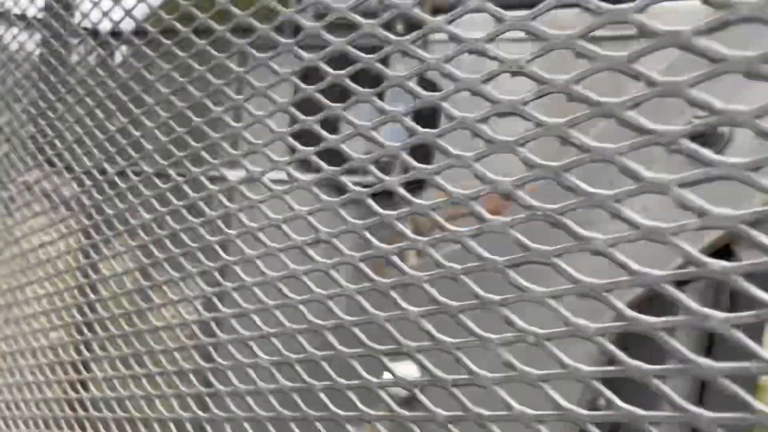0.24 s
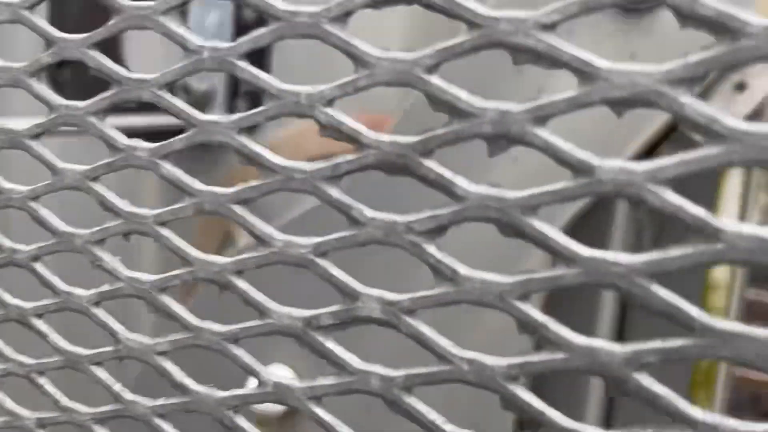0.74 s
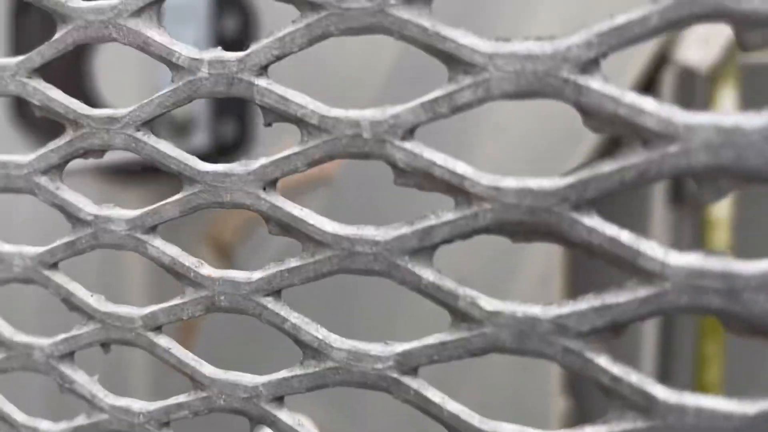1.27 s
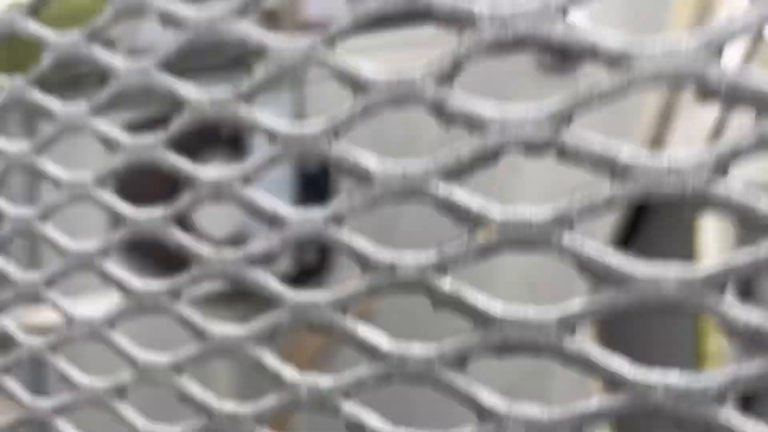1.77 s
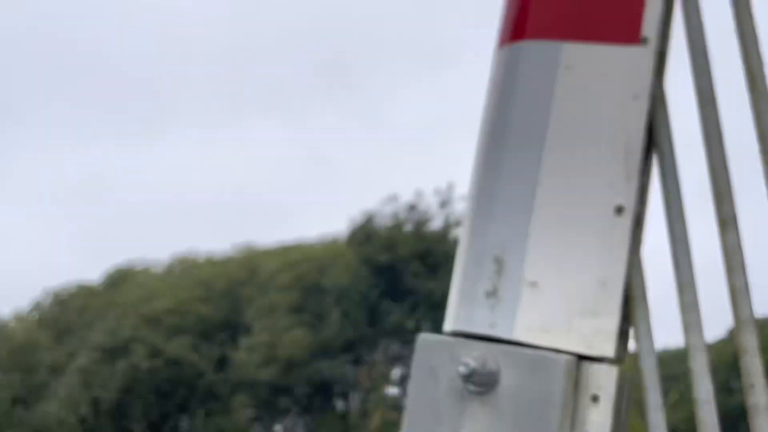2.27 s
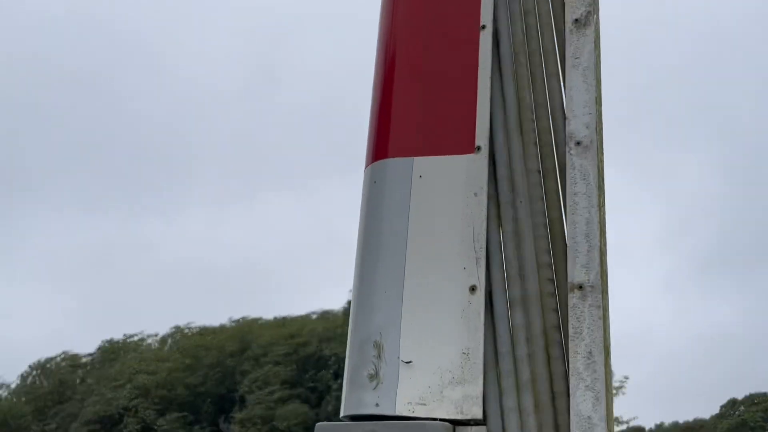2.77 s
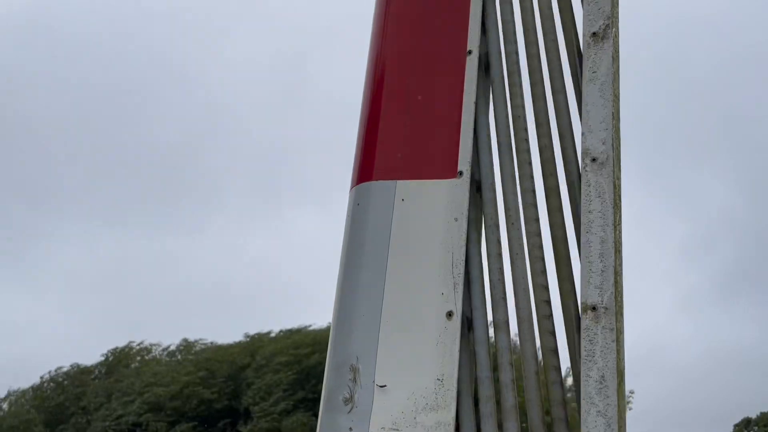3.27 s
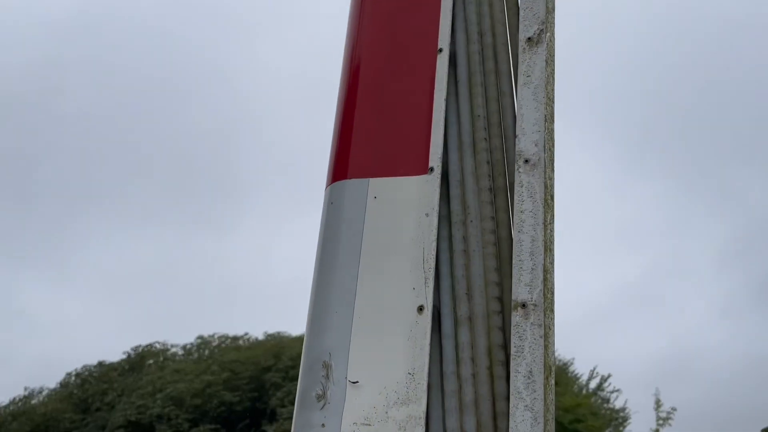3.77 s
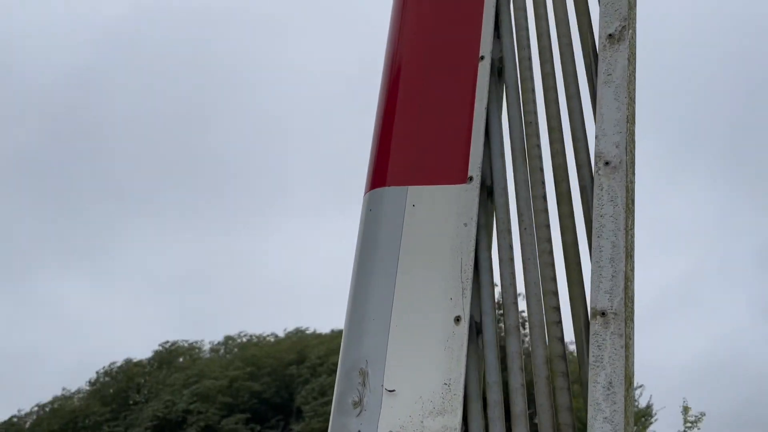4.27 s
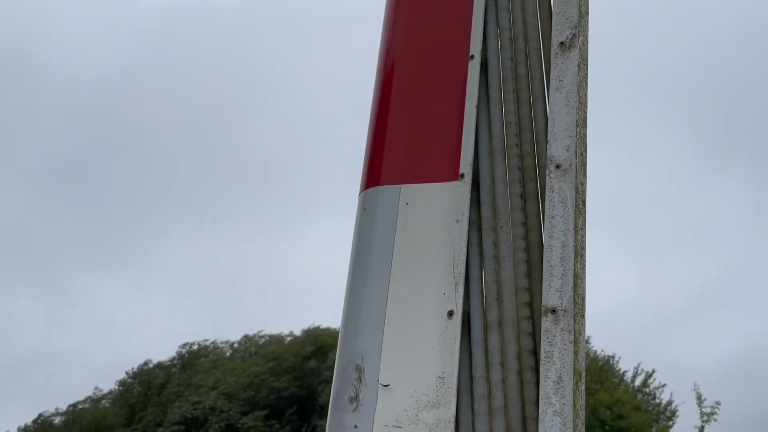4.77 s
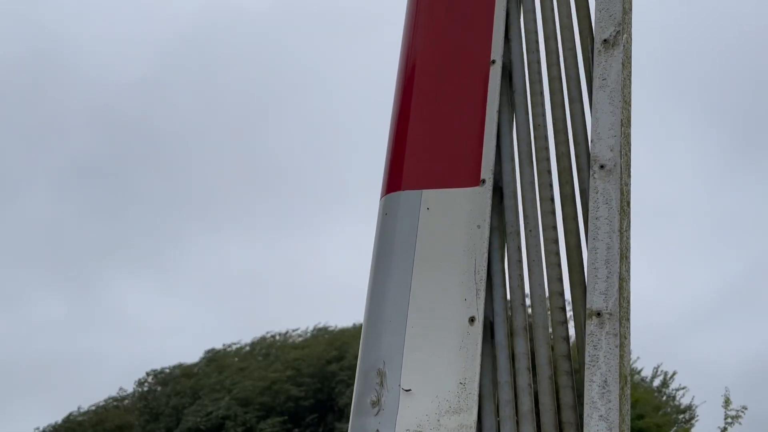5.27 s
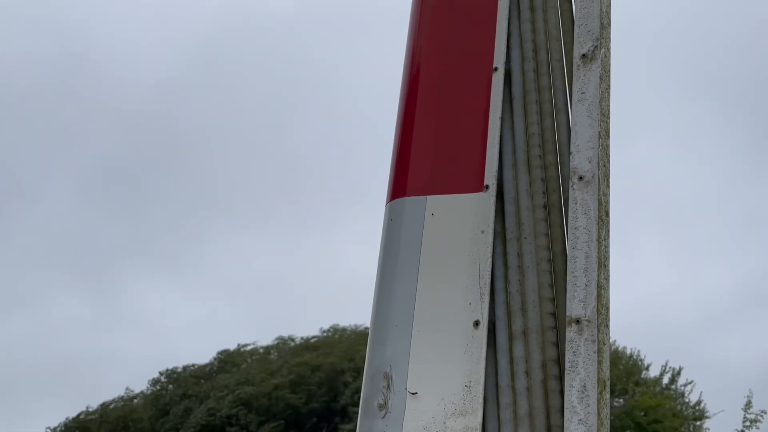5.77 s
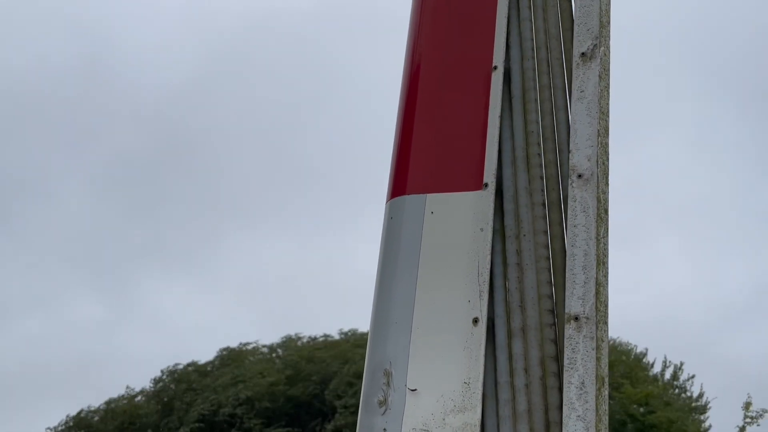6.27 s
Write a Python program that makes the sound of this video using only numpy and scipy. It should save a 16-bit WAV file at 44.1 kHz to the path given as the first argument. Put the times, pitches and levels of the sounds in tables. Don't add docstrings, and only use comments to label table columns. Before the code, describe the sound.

A droning geared motor winds down quickly, leaving thin bars ticking and clattering together above road rumble and a softly idling engine.

```python
import sys
import numpy as np
from scipy import signal
from scipy.fft import rfft, irfft, next_fast_len
from scipy.io import wavfile
from scipy.ndimage import uniform_filter1d

SR = 44100
rng = np.random.default_rng(int(sys.argv[2]) if len(sys.argv) > 2 else 0)


def master(y):
    cut = np.clip(np.atleast_2d(y).T, -1, 1)
    pcm = np.round(cut * 32767)
    wavfile.write(sys.argv[1], SR, pcm.astype(np.int16))


def elevation(decibels):
    levels = np.asarray(decibels, float)
    return 10 ** (levels / 20)


N = 287973
T = np.arange(N) / SR


def evened(x):
    return x / np.sqrt(np.mean(x ** 2) + 1e-20)


def read(points, hz):
    f, value = np.transpose(points)
    return np.interp(np.log(hz + 1), np.log(f + 1), value)


def curves(rows):
    s, *columns = np.transpose(rows)
    since_start = T - s[0] + .03 * (s[0] == 0)
    gate = np.clip(np.minimum(since_start, s[-1] - T) / .03, 0, 1)
    return gate, *(np.interp(T, s, c) for c in columns)


def stage(start, full, ease, end):
    return np.clip(np.minimum((T - start) / (full - start), (end - T) / (end - ease)), 0, 1)


def drift(per_s):
    hz = np.geomspace(per_s / 12, per_s, num=16)
    t = T[::64, None]
    slow = (np.sin(2 * np.pi * (hz * t + rng.random(16))) / np.sqrt(hz)).sum(1)
    return np.interp(T, t[:, 0], evened(slow))


# pitch_hz, likeness_0_to_1
LIKENESS = [(60, 0.9221), (130, 0.9192), (290, 0.46), (640, 0.25), (1410, 0.14), (3100, 0.6707),
            (5500, 0.5623), (7000, 1), (16000, 0.7914)]


def noise(colour, patchy_db, alike):
    frames, hz = N // 256 + 5, np.fft.rfftfreq(1024, 1 / SR)
    a, b, c, d, patches = rng.standard_normal((frames, 513, 5)).T
    patches = evened(uniform_filter1d(uniform_filter1d(patches, 10, 0), 12, 1))
    same = np.clip(read(LIKENESS, hz) * (1 - alike) + alike, 0, 1)[:, None]
    mid = (a + 1j * b) * np.sqrt(1 + same)
    side = (c + 1j * d) * np.sqrt(1 - same)
    z = np.array([mid + side, mid - side]) * elevation(read(colour, hz)[:, None] + patchy_db * patches)
    return evened(signal.istft(z, nperseg=1024, noverlap=768)[1][:, :N])


def groan(rows, steady, grain_s):
    gate, hz, db = curves(rows)
    grain = round(grain_s * SR)
    a, b = uniform_filter1d(uniform_filter1d(rng.standard_normal((2, N)), grain), grain)
    turn = np.exp(2j * np.pi * np.cumsum(hz) / SR)
    stumble = steady + (1 - steady) * (evened(a) + 1j * evened(b))
    return gate * elevation(db) * (stumble * (turn + 0.17405 * turn ** 2)).real


def ring(hits, modes):
    out = np.zeros(N)
    for h, (hz, t60, db) in zip(hits, modes):
        r, w = elevation(-60 / (t60 * SR)), 2 * np.pi * hz / SR
        poles = [1, -2 * r * np.cos(w), r ** 2]
        out += signal.lfilter([0, elevation(db) * r * np.sin(w)], poles, h + 1e-12)
    return out


def add(mix, s, sound):
    part = mix[round(s * SR):][:len(sound)]
    part += sound[:len(part)]


# time_s, turns_hz
SHAFT_SPEED = [(0, 70.5), (.5, 70.6), (.62, 70.25), (1.2, 70), (1.45, 69.65), (1.7, 69.5), (2.05, 69.1),
               (2.62, 69.1)]


def shaft_turn():
    return 2 * np.pi * np.cumsum(curves(SHAFT_SPEED)[1]) / SR


# multiple_of_shaft, level_db
LOW_ORDERS = [(1, -51), (2, -56), (3, -57), (4, -51), (6, -56), (7, -61), (9, -60), (15, -66), (19, -66),
              (20, -66)]
# multiple_of_shaft, level_db
SLOT_ORDERS = [(34, -70), (36, -68), (37, -64), (38, -68), (39, -68), (40, -67), (41, -60), (43, -59),
               (45, -68), (46, -70), (48, -70)]
# time_s, gain_db
SLOT_GAIN = [(0, -2.5), (.9, 0.5), (1.4, 1), (1.8, -4), (2.0, -8), (2.62, -1)]
# time_s, share_0_to_1
GEAR_LOAD = [(0, 0), (.33, .3), (.55, .78), (1.2, 0.96), (1.75, 0.93), (2.0, 0.82), (2.62, .6)]
# time_s, level_db
FIFTH_ORDER = [(0, -47), (.07, -45), (.16, -40.5), (.24, -42), (.33, -44), (.385, -39), (.46, -39),
               (.496, -48), (.53, -38), (.66, -35), (1.2, -36), (1.92, -36), (1.99, -47), (2.62, -48)]
TENTH_DB, TENTH_LIGHT_DB = -42, -26
EIGHTH_DB, EIGHTH_GAIN_DB_PER_S = -66.5, 6
BEAT_PER_S, BEAT_TOP_S = 12.8, .155
BEAT_ASIDE = (.07, .09, .36, .385)  # starts, full, eases, gone [s]


def shaft_whine(turn):
    gate, load = curves(GEAR_LOAD)
    on = slice(np.count_nonzero(gate) + 1)
    aside = stage(*BEAT_ASIDE) + (T > FIFTH_ORDER[-2][0])
    throb = 1 - aside * (1 + np.cos(np.pi * BEAT_PER_S * (T - BEAT_TOP_S)))
    fifth_db = curves(FIFTH_ORDER)[1]
    tenth_db = TENTH_DB + TENTH_LIGHT_DB * (1 - load)
    eighth_db = EIGHTH_DB + EIGHTH_GAIN_DB_PER_S * T
    slot_db = curves(SLOT_GAIN)[1] + 1.052
    lines = np.zeros(N)
    for k, db, swell in ((5, fifth_db, throb), (10, tenth_db, 1), (8, eighth_db, 1)):
        lines += elevation(db + 1.0 * drift(25)) * np.sin(k * turn) * swell
    for k, db in LOW_ORDERS + SLOT_ORDERS:
        gain_db = np.where(k > 30, slot_db[on], -2.5)
        level = elevation(db + gain_db + 2.034 * drift(10.097)[on])
        lines[on] += level * np.sin(round(k) * turn[on] + 6.937 * rng.random())
    return gate * lines


# time_s, pitch_hz, level_db
GEAR_WEAR = [(0, 353, -62), (.6, 351, -56), (1.9, 346, -56), (2.15, 345, -48), (2.4, 345, -52),
             (2.64, 345, -50)]
# time_s, pitch_hz, level_db
FIFTH_RUNDOWN = [(2.6, 344.3, -50.5), (2.65, 308.9, -31), (2.71, 235, -31), (2.75, 170.4, -37.5),
                 (2.79, 124.9, -50.5)]
# time_s, pitch_hz, level_db
TENTH_RUNDOWN = [(2.65, 640, -47), (2.73, 379.3, -43), (2.77, 240.7, -35), (2.81, 187.7, -31),
                 (2.86, 139.2, -35), (2.93, 109.8, -53)]


def gear_groan():
    return groan(GEAR_WEAR, 0, .03) + groan(FIFTH_RUNDOWN, .7, .007) + groan(TENTH_RUNDOWN, .4, .007)


# pitch_hz, level_db
AIR_COLOUR = [(530, -52.5), (900, -24), (1370, -12), (1770, -18), (2930, 0), (3710, -3), (5630, -3),
              (7300, -12), (8500, -11.5), (10000, -16.5), (11600, -17), (13500, -18), (15400, -17),
              (16300, -47)]
AIR_DB, VENT_DB, BRAKE_DB = -53, 7, 6.5
VENT = (.84, .93, 1.47, 1.58)
BRAKE = (2.55, 2.7, 2.72, 2.9)


def guard_air(turn):
    air_db = AIR_DB + VENT_DB * stage(*VENT) + BRAKE_DB * stage(*BRAKE)
    running = np.clip((BRAKE[-1] - T) / .03, 0, 1)
    pulse = 1 + 0.066 * np.cos(turn)
    return running * elevation(air_db - 1.0) * pulse * noise(AIR_COLOUR, 1.0, 0.35)


# time_s, left_over_right_db
MOTOR_LEAN = [(0, 2.5), (.7, 4), (1.2, 2), (2.3, 3.5), (2.8, 0.5)]


def motor():
    turn = shaft_turn()
    tones = shaft_whine(turn) + gear_groan()
    lean_db = curves(MOTOR_LEAN)[1] * np.array([[.5], [-.5]])
    return (np.sqrt(2) * tones + guard_air(turn)) * elevation(lean_db)


# time_s, rumble_db
TRAFFIC_LEVEL = [(0, -60.5), (.2, -49.5), (.52, -44.5), (.92, -55.5), (1.37, -43.5), (2.2, -41),
                 (2.5, -43.5), (2.92, -33), (3.65, -36.5), (3.9, -33), (4.97, -36), (5.67, -33), (6.3, -31)]
# pitch_hz, level_db_per_hz
RUMBLE_COLOUR = [(12, -54), (20, -8), (43, 2), (80, 0.5), (135, -11.5), (182, -15), (220, -18.5),
                 (357, -15), (431, -12.5), (500, -26.5), (650, -21.5), (1100, -120)]
# pitch_hz, level_db_per_hz
WASH_COLOUR = [(88, -34.5), (150, -2), (234, -5), (428, -3.5), (668, -9), (1600, -13.5), (1830, -15),
               (2810, -17), (4840, -23), (7270, -28), (9000, -27), (11000, -39), (15400, -44),
               (16300, -66.5)]
WASH_DB, WASH_SHARE, WASH_LAG_S = -43.5, 0.4261, 0.76
PULL_DB, PULL_S = 2.2, (4.8857, 6.2)
SHELTER_DB, SHELTER = -3, (1.0, 1.4, 1.95, 2.2)


def road():
    rumble_db = curves(TRAFFIC_LEVEL)[1]
    slow_db = uniform_filter1d(rumble_db, round(WASH_LAG_S * SR), mode="nearest")
    wash_db = WASH_DB + WASH_SHARE * (slow_db + 34)
    wash_db += np.interp(T, PULL_S, (0, PULL_DB)) + SHELTER_DB * stage(*SHELTER)
    rumble = elevation(rumble_db + .5 + .7 * drift(8)) * noise(RUMBLE_COLOUR, 1, 0)
    return rumble + elevation(wash_db + 3.0 + 0.7 * drift(5)) * noise(WASH_COLOUR, 2.0493, 0.081)


# start_s, peak_db, case_ring_hz, ring_re_peak_db, pitch_sag_share
HAND_CLICKS = [
    (.1087, -16.5, 1155, -4, .8),
    (.606, -42, 868.3, 17, 0.26),
    (2.3487, -19, 899, -21, 0.01),
    (2.3492, -19, 1900, -6, .5),
    (2.3498, -4.5, 1020, -12.5, .25),
    (2.3669, -28.5, 912, 6, 0),
    (2.3701, -22.5, 900.1, -14, 0.04),
    (5.081, -23, 1160, 6, .9),
    (5.09, -36, 620, 12, .5),
    (5.2675, -31, 1190, 7, 1.2),
]


def hand():
    out, t = np.zeros((2, N)), T[:1500]
    grit = rng.standard_normal((len(HAND_CLICKS), 2, 1500))
    rise = np.exp(-((t - .0006) / 0.00021) ** 2)
    for (s, db, hz, ring_db, sag), pair in zip(HAND_CLICKS, grit):
        hard = elevation(.4 * db)
        bright = 0.22 * np.sin(2 * np.pi * 10500 * t) + 0.2 * np.sin(2 * np.pi * 6700 * t)
        snap = hard * bright - np.sin(2 * np.pi * 3100 * (t - .0006))
        case = np.sin(2 * np.pi * hz * (t - sag * 60 * t ** 2))
        case = case * np.exp(-t / 0.0035) * np.minimum(t / 0.00161, 1)
        for side, row in zip(out, pair):
            add(side, s - .0006, elevation(db) * (rise * (snap + .015 * row) + elevation(ring_db) * case))
    return out


# start_s, rattle_db, dies_60_db_s, low_body_re_rattle_db
SKIRT_SHAKES = [(2.7, -53.5, 1.27, 19.5), (2.76, -29, 0.6215, 0), (3.2, -26, .25, 1),
                (3.3, -33, 0.0016, -8.5), (3.345, -30.5, 0.2702, -12), (3.462, -33, 3, -3),
                (3.552, -22, .3, 5), (3.727, -32, .3, -6), (3.847, -33, 0.4295, -2.5), (4.15, -25, .13, -8),
                (4.21, -27, 0.1791, -2.5), (4.33, -37, 0.3832, -14.5), (4.459, -29, 0.42, 3.5),
                (4.69, -41, .5, -10.5), (5.082, -42, .35, 18), (5.4, -41, 2.0171, -6)]
SOFT_DB, SHAKE_RISE_S = -29.5, .005
SWING_DB, SWING_LOW_DB = -44, -5.5
SWING = (3.2, 3.3, 5.2, 5.6)


def shaking():
    t, (s, db, t60, low_db) = T[::32], np.transpose(SKIRT_SHAKES)[:, :, None]
    rise = np.clip((t - s) / (SHAKE_RISE_S * elevation(db - SOFT_DB)), 0, 1)
    shakes = (rise * elevation(db - 60 * np.maximum(t - s, 0) / t60)) ** 2
    brush = (stage(*SWING) * elevation(SWING_DB)) ** 2
    high, low = (np.interp(T, t, p.sum(0)) for p in (shakes, shakes * elevation(2 * low_db)))
    return np.sqrt(high + brush), np.sqrt(low + brush * elevation(2 * SWING_LOW_DB))


# pitch_hz, level_db_per_hz
METAL_COLOUR = [(590, -28), (1000, -11.5), (1900, -14), (2180, -4.5), (2450, -11), (2650, -14.5),
                (6340, -15.5), (7440, -18.5), (9040, -20), (10500, -25.5), (12800, -37), (15400, -36.5),
                (16300, -60)]
# pitch_hz, dies_60_db_s, level_db
BAR_MODES = [(1590, 0.04, -1), (2110, 0.06, -3), (2210, .08, -16.5), (2340, .05, -32.5), (2650, 0.05, 4.5),
             (3490, 0.05, -6), (4270, .04, -4), (4300, .05, -8), (5117.2, .045, -5), (5414.1, 0.021, 1.5),
             (6700, 0.043, -15.5), (10100, 0.033, -34)]
# pitch_hz, dies_60_db_s, level_db
BOOM_MODES = [(276.79, 0.10326, -1.5), (410.91, 0.10777, 1), (525.93, 0.03307, 9), (612, 0.085, 0),
              (744.95, 0.056, -1.5), (985.72, 0.044, 0.5), (1338, 0.031, -3)]


def rattle():
    high, low = shaking()
    struck = rng.random(N) < 1500 / SR
    size = elevation(3 * np.minimum(rng.exponential(1, N), 4) + 3.2 * drift(90)) * struck
    which = rng.integers(0, len(BAR_MODES), N)
    grains = signal.lfilter([1], [1, -np.exp(-1 / (0.0047 * SR))], size)
    metal = np.sqrt(evened(grains)) * noise(METAL_COLOUR, 3.915, 0.7)
    bars = ring([size * high * (which == k) for k in range(len(BAR_MODES))], BAR_MODES)
    body = ring([size * low * (which == k) for k in range(len(BOOM_MODES))], BOOM_MODES)
    unit = np.sqrt(np.mean(size ** 2))
    return elevation(-5) * high * metal + (elevation(-32) * bars + elevation(-26) * body) / unit


# start_s, peak_db, brightness_hz, dies_60_db_s
TIP_CLINKS = [(2.7323, -31, 6350, .03), (2.7595, -19, 11000, .06), (2.7849, -19, 7000, .05),
              (2.8576, -20, 6319, .02), (2.924, -35, 9500, .15), (3.2385, -19, 9000, .03),
              (3.302, -11, 5695, .018), (3.3206, -21, 7480, .015), (3.3408, -11, 9260, .012),
              (3.3551, -16, 6500, .02), (3.4586, -23.5, 8500, .015), (3.482, -24, 9000, .03),
              (3.5205, -21, 9000, .02), (3.7335, -24, 6000, .06), (3.771, -9, 7000, .014),
              (3.849, -23, 5637, .04), (3.905, -29, 6500, .015), (4.125, -21, 5001, .025),
              (4.1532, -7, 4300, .012), (4.205, -18.5, 5986, .02), (4.2148, -16, 9000, .011),
              (4.2243, -16, 8000, .035), (4.2423, -13.5, 9244, .013), (4.296, -25, 7000, .012),
              (4.332, -21.5, 9456, .015), (4.35, -27, 7000, .012), (4.394, -29, 8000, .02),
              (4.4198, -19.5, 6645, .02), (4.4617, -22, 6514, .03), (4.608, -31, 6660, .02),
              (4.6837, -28, 9000, .02), (4.927, -38, 11000, .04), (4.9416, -28, 6270, .025),
              (5.0665, -31, 6500, .012), (5.171, -35, 8000, .015), (5.2458, -36, 11000, .015),
              (5.2688, -28, 10500, .015), (5.374, -35, 10500, .015), (5.4074, -29, 11000, .015),
              (5.8001, -34, 11000, .012), (5.8799, -33, 11000, .012), (6.062, -36, 11000, .012)]


def clinks():
    out, t, hz = np.zeros((2, N)), T[:2000], np.fft.rfftfreq(2000, 1 / SR)
    chance = rng.standard_normal((len(TIP_CLINKS), 3, 2000))
    for (s, db, bright_hz, t60), (both, left, right) in zip(TIP_CLINKS, chance):
        octaves = np.log2((hz + 1) / bright_hz)
        colour = elevation(np.where(octaves < 0, 9.0 * octaves, -17 * octaves)) / (1 + (hz / 15800) ** 20)
        fall = elevation(-60 * t / t60) + .1 * elevation(-15 * t / t60)
        snap = (both + .45 * np.array([left, right])) * np.minimum(t / t60 * 30, 1) * fall
        snap = irfft(rfft(snap) * colour, 2000) * np.cos(np.pi / 2 * t / t[-1])
        for side, sound in zip(out, snap):
            add(side, s, elevation(db - .6) * sound / abs(snap).max())
    return out


# start_s, peak_db, ping_hz, low_knock_re_peak_db
BAR_TICKS = [(2.7655, -20, 4221, -20.5), (2.7857, -23, 2203, -5), (2.858, -32, 2210, -11),
             (3.062, -35, 3650, -20), (3.1263, -31.5, 1590, 2.5), (3.2032, -27, 1600, -6),
             (3.2036, -24, 3352, -2), (3.2396, -28, 3470, -15), (3.268, -33, 1600, -10),
             (3.283, -30, 2650, -3.5), (3.3027, -19, 4270, -13.5), (3.3408, -24, 2744, -26.5),
             (3.323, -30, 2500, -20), (3.4005, -32, 2550, -20), (3.4595, -33, 2100, -8),
             (3.481, -31, 1700, -15), (3.494, -31, 2000, -15), (3.508, -32, 1200, -5),
             (3.519, -27, 2600, -10), (3.5599, -25, 2110, -6.5), (3.6646, -35, 2570, -1),
             (3.6761, -31, 2130, -20), (4.1545, -17, 1100, -8), (3.7728, -20, 4397, -34.5),
             (4.0239, -23, 2663, -5.5), (4.1236, -30.5, 4019, -6), (4.152, -12, 2900, -20),
             (4.2052, -33, 1605, 2), (4.2139, -25.5, 2293, -15), (4.3289, -32, 2083, -28),
             (4.375, -23, 2109, -39), (4.4618, -26, 2302, -7), (4.559, -31, 2610, 2),
             (4.6084, -33, 1670, -5), (4.6837, -32, 2100, -15), (5.0359, -33, 3620, -20),
             (5.1367, -34, 3560, -20), (5.1871, -30, 2130, -20), (6.1409, -33, 1590, -20),
             (5.0805, -28, 1598, -6), (5.094, -29, 490, 2), (5.3086, -23.5, 2126, -27.5),
             (5.4619, -31, 1700, -7.5)]
SOFT_RING_S, HARD_SHARE = 0.021726, 0.35215


def ticks():
    n_bars, n_body = len(BAR_MODES), len(BOOM_MODES)
    out, bars, body = np.zeros(N), np.zeros((n_bars, N)), np.zeros((n_body, N))
    chance = rng.standard_normal((len(BAR_TICKS), 2000 + n_bars + n_body))
    t, hz = T[:2000], np.fft.rfftfreq(2000, 1 / SR)
    for (s, db, ping_hz, low_db), row in zip(BAR_TICKS, chance):
        t60 = SOFT_RING_S * elevation(HARD_SHARE * (SOFT_DB - db))
        fall = elevation(-60 * t / max(t60, .004))
        colour = elevation(.5 * read(METAL_COLOUR, hz) - 10.0 * abs(np.log2((hz + 1) / ping_hz)))
        crack = row[:2000] * (fall + 0.19 * elevation(-60 * t / 0.17))
        crack = irfft(rfft(crack) * colour, 2000) * np.cos(np.pi / 2 * t / t[-1])
        ping = .45 * np.sin(2 * np.pi * ping_hz * t) * fall ** .8
        strike = (crack / abs(crack).max() + ping) * np.minimum(t / 0.00027, 1)
        add(out, s, elevation(db + 1.0) * strike)
        near = elevation(-9.0 * abs(np.log2(np.array(BAR_MODES)[:, 0] / ping_hz)))
        bars[:, round(s * SR)] += elevation(db - 19.5) * near * np.tanh(row[2000:2000 + n_bars])
        body[:, round(s * SR)] += elevation(db + low_db - 5.5) * np.tanh(2 * row[-n_body:])
    return out + ring(bars, BAR_MODES) + ring(body, BOOM_MODES)


# time_s, second_order_db
EXHAUST_BOOM = [(3.2, -48), (3.57, -36), (4.0, -34.5), (4.7, -38), (5.3, -44), (5.5, -40.5), (6.5, -38.5)]
IDLE_S, IDLE_HZ, REV_HZ, REV_S = 3.2, 43.647, 45.523, (5.3, 5.6)
FIRST_DB, LOPE_DB = -39, 3


def idling_engine():
    hz = np.interp(T, REV_S, (IDLE_HZ, REV_HZ))
    gate = np.clip((T - IDLE_S) / .03, 0, 1)
    turn = 2 * np.pi * np.cumsum(hz * (1 + 0.0045 * drift(10))) / SR
    firing = elevation(FIRST_DB + LOPE_DB * drift(6)) * np.sin(turn)
    boom_level = elevation(curves(EXHAUST_BOOM)[1] + 1.5 * drift(12))
    boom = boom_level * (np.sin(2 * turn) + 0.26636 * np.sin(4 * turn))
    return np.sqrt(2) * gate * (firing + boom) * elevation(np.array([[-.8], [.8]]))


# start_s, level_db, pitch_hz, dies_60_db_s
BAR_RINGS = [
    (3.204, -27, 3480, .1),
    (3.212, -29, 1590, .1),
    (3.356, -32, 3490, .3),
    (3.36, -38, 5030, .2),
    (3.559, -25, 2150, .2),
    (3.735, -38, 2220, .12),
    (4.227, -33, 3490, .25),
    (4.47, -34, 2110, .4),
    (4.48, -43, 3480, .3),
]


def rings():
    out, t = np.zeros(N), T[:9000]
    chance = rng.standard_normal((len(BAR_RINGS), 2, 9000))
    for (s, db, hz, t60), row in zip(BAR_RINGS, chance):
        a, b = evened(uniform_filter1d(uniform_filter1d(row, 200), 200))
        hum = ((.6 + .5 * (a + 1j * b)) * np.exp(2j * np.pi * hz * t)).real
        edges = np.minimum(t / .003, 1) * np.cos(np.pi / 2 * t / t[-1])
        add(out, s, elevation(db - 60 * t / t60) * hum * edges)
    return out


# time_s, pitch_hz, level_db
PULLING_AWAY = [(5.42, 44.76, -47), (5.53, 53.17, -30), (5.66, 64.4, -47.5), (5.75, 79.46, -29.5),
                (5.84, 109.8, -42), (5.9, 122.3, -54.5)]


def vehicle_surge():
    return np.sqrt(2) * groan(PULLING_AWAY, 0.888, 0.0414)


def yard(x):
    sparse = rng.choice([-1., 1.], (2, 5000)) * (rng.random((2, 5000)) < .05)
    taps = sparse * elevation(-60 * T[:5000] / 0.041)
    taps[:, :90] = 0
    return signal.fftconvolve(x[None], taps / np.linalg.norm(taps[0]), axes=1)[:, :N]


def scene():
    outdoors = road() + idling_engine() + vehicle_surge()
    clicks = hand() * elevation(np.array([[.4], [-.4]]))
    strikes = ticks() + rings()
    return motor() + outdoors + clicks + rattle() + strikes + elevation(-8) * yard(strikes) + clinks()


# pitch_hz, left_leads_rad
PORT_LEAD = [(0, 0), (5250, 0), (6100, -.3), (6900, -.9), (7600, -2.4), (8000, -2.95), (8900, -3.4),
             (9400, -4.2), (10100, -5.6), (11500, -6.28), (12800, -7), (14000, -8.9), (15000, -9.42),
             (16500, -9.7)]


def two_ports(dry):
    size = next_fast_len(N + 2048)
    hz = np.fft.rfftfreq(size, 1 / SR)
    turn = np.exp(.5j * read(PORT_LEAD, hz) * np.array([[1], [-1]]))
    low_cut = np.sqrt(1 + (38 / (hz + 1)) ** 14)
    return irfft(rfft(dry, size) * turn / low_cut, size)[:, :N]


def starve(x, under_db, quiet_db):
    z = signal.stft([x[0] + x[1], x[0] - x[1]], nperseg=2048, noverlap=1024)[2][:, :1024]
    band_db = 10 * np.log10((abs(z) ** 2).reshape(2, 64, 16, -1).mean(2) + 1e-20)
    keep = (band_db > band_db[::-1] - under_db) & (band_db > quiet_db)
    keep[:, :6] = True
    z = np.pad(z * np.repeat(keep, 16, axis=1), ((0, 0), (0, 1), (0, 0)))
    mid, side = signal.istft(z, nperseg=2048, noverlap=1024)[1][:, :N]
    return np.array([mid + side, mid - side]) / 2


END_S, END_FALL_DB_PER_S = 6.408, 1150


def abrupt_end(x):
    after = np.maximum(T - END_S, 0)
    return x * elevation(-32 * np.minimum(after / .002, 1) - END_FALL_DB_PER_S * after)


def low_pass(x):
    return signal.sosfilt(signal.butter(12, 16650, fs=SR, output="sos"), x)


def record(dry):
    x = two_ports(dry)
    x = starve(x, under_db=12.5, quiet_db=-89)
    return low_pass(abrupt_end(x))


dry = scene()
out = record(dry)
master(out)
```